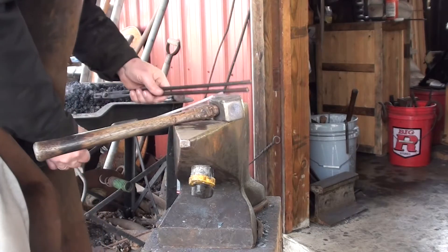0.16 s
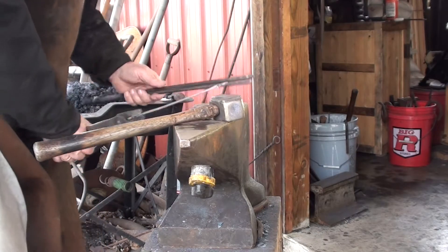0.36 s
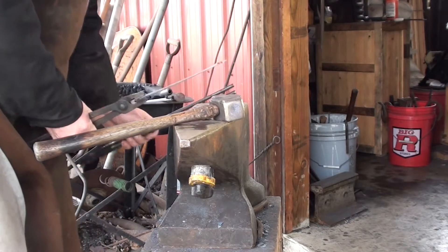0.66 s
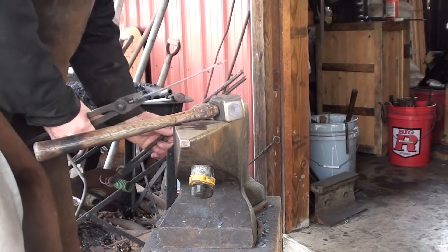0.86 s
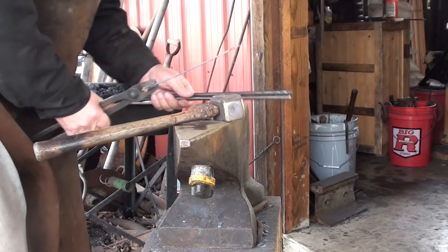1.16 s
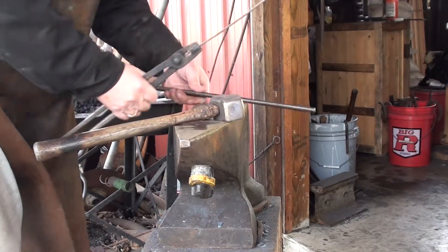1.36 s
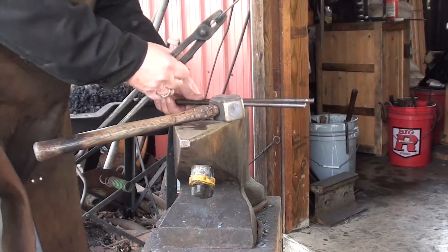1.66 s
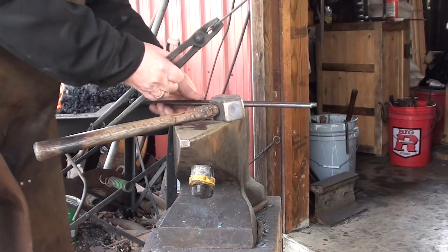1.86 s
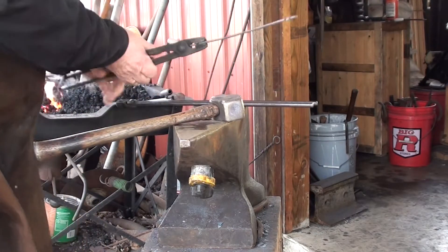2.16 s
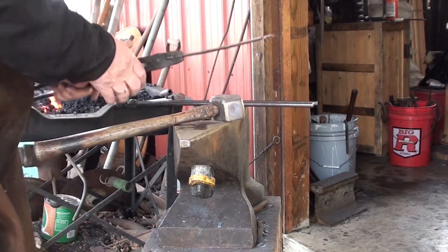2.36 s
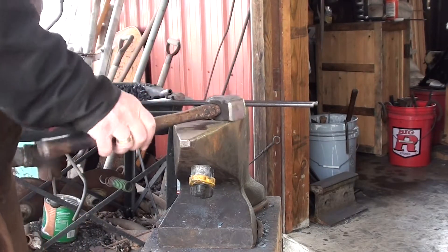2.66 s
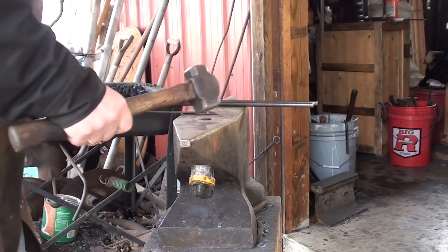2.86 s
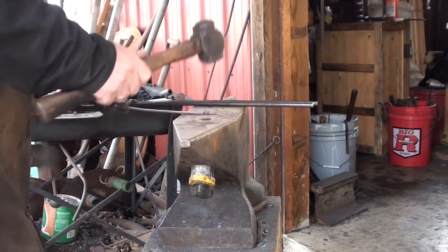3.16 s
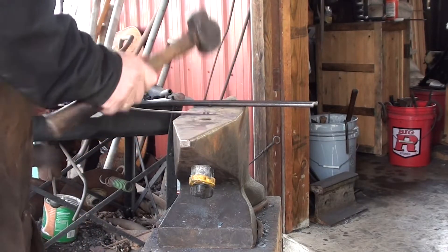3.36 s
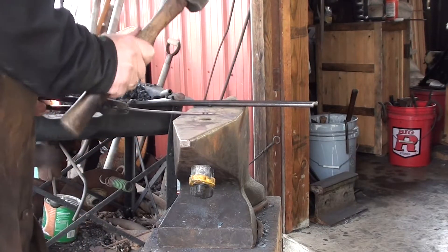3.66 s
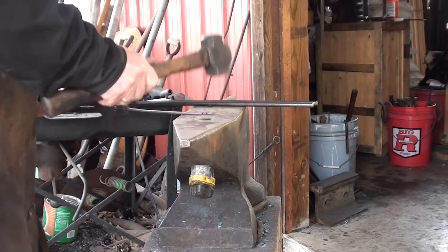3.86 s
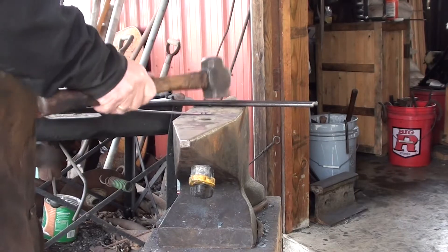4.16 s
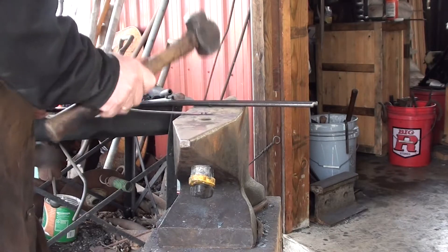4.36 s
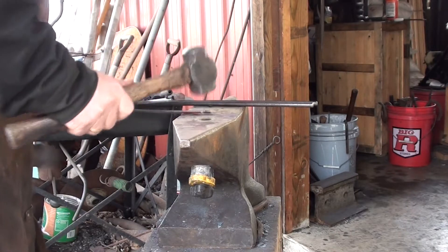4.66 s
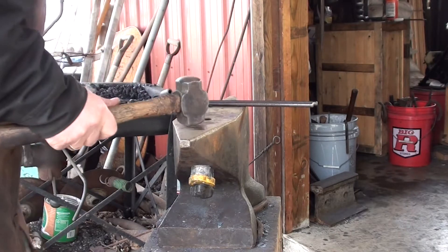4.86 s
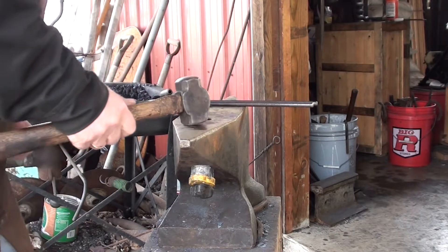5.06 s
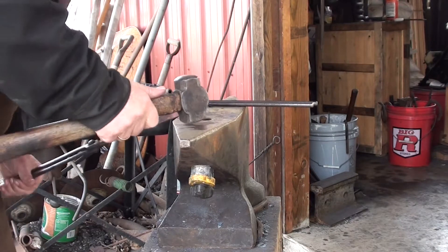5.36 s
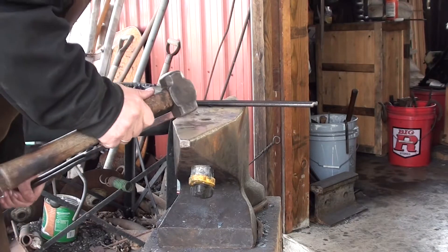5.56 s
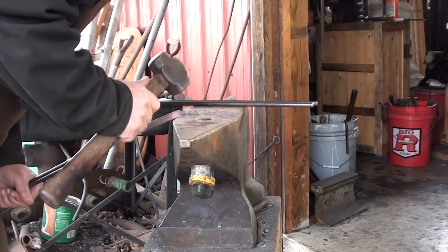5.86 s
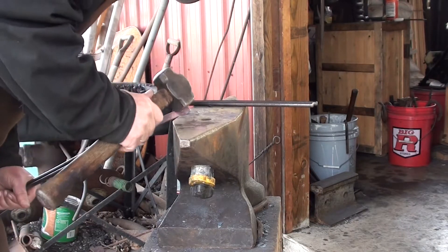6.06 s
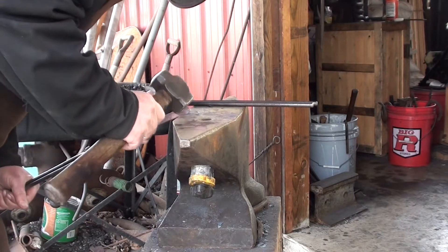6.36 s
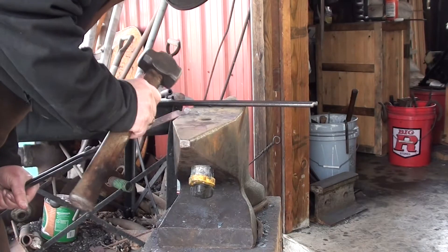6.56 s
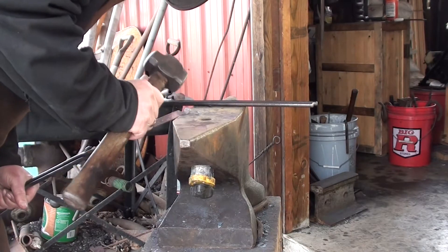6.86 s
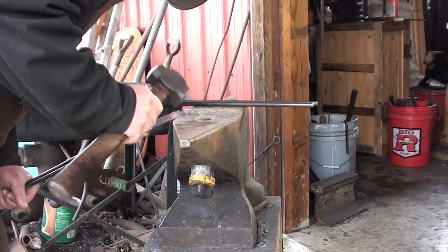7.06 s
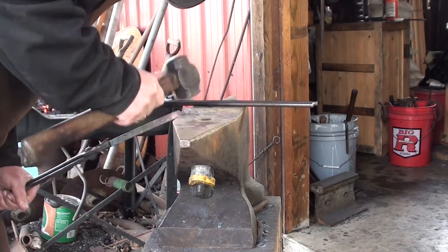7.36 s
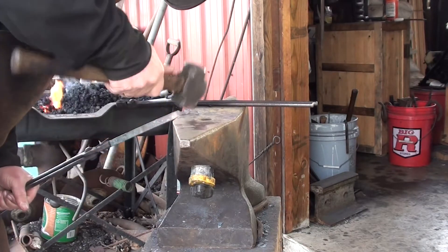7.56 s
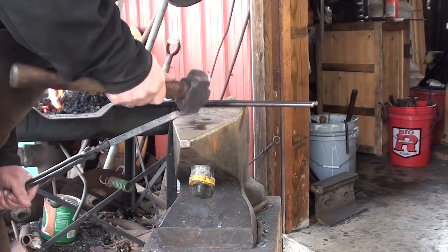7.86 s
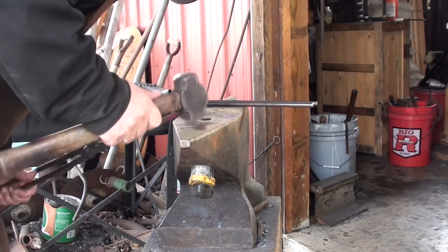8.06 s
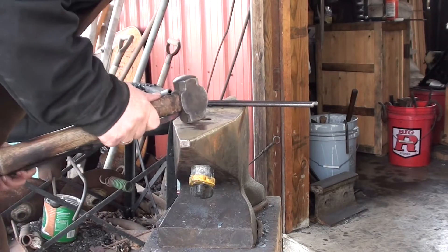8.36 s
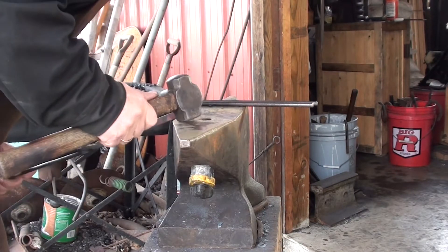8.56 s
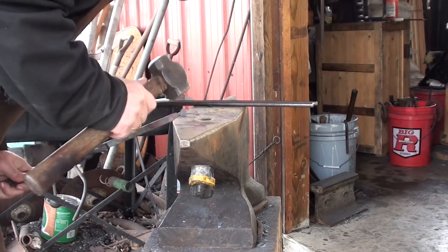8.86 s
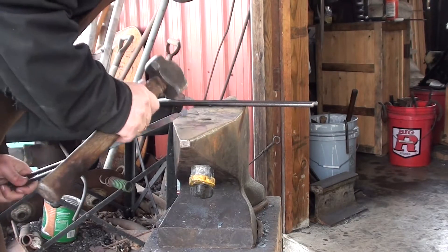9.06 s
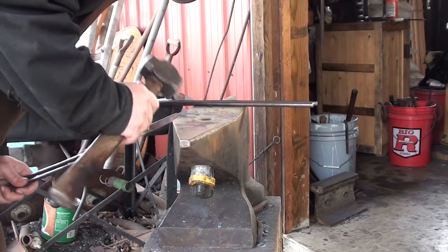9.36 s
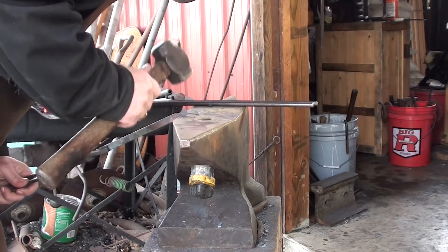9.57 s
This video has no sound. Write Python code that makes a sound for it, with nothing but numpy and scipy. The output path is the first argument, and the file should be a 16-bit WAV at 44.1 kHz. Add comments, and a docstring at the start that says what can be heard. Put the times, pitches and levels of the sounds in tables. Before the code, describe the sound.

In a small forge, light metal clinks and faint bird whistles give way to dull hammer knocks in steady runs, with occasional bright anvil rings.

```python
"""A forge murmurs in a small shed and a draught rumbles on the microphone throughout, both shaped noise.
Tongs and rod clink and scrape on the anvil (struck modes, noise bursts) as a far bird whistles (sines).
The hammer is picked up and dropped on the bare anvil, then works the rod in quick runs: blows knock dully,
those that reach the anvil ring, and the hammer bounces to rest. Nearly all is in the left channel.
Levels in dB are ahead of the shed's echoes and the channel gains."""
import sys
import numpy as np
from scipy import signal
from scipy.fft import rfft, irfft, next_fast_len
from scipy.io import wavfile

SR = 44100
rng = np.random.default_rng(int(sys.argv[2]) if len(sys.argv) > 2 else 0)


def inscribe(sig):
    """Save sig as 16-bit PCM at rate SR to the path in sys.argv[1].

    A 1-D sig is mono; a 2-D sig holds one channel per row.
    Samples are clipped to [-1, 1] before scaling.
    """
    pcm = np.round(np.clip(np.atleast_2d(sig).T, -1, 1) * 32767)
    wavfile.write(sys.argv[1], SR, pcm.astype(np.int16))


N = 427769
RING_SIZE = SR // 2  # samples that a contact may ring

# Hammer blows on the work. Each row: start in seconds, strength in dB, knock in Hz, support (0 overhanging
# the edge, 1 flat on the face), stand thud in dB, anvil ring in dB.
BLOWS = [(3.3642, -26.5, 930, 0.44, -35.5, -49.5), (3.7233, -26.5, 957, 0.85, -36, -42),
         (4.0692, -27, 985, 1, -38, -35), (4.3744, -25, 1005, .92, -37.5, -33),
         (4.6696, -28.5, 950, .9, -39.5, -20.5), (6.3071, -34, 1080, 0.38, -33, -56),
         (6.612, -31.5, 1210, 0.45, -41.5, -58.5), (6.9338, -25, 1194, 0.05, -35.5, -50),
         (7.2238, -26, 1225, 0.03, -33.5, -65.5), (7.5288, -27, 1065, 0.39, -28, -51.5),
         (7.814, -25.5, 976, 0.4, -31, -53), (8.032, -28.5, 1218, 1, -39.5, -23.5),
         (9.0672, -31, 1193, .08, -33, -55), (9.3594, -29, 1304, 0.3, -34, -63.5),
         (9.666, -29.5, 1146, 0.38, -33, -47)]
# Modes of the rod. Each row: frequency in Hz, relative level in dB, t60 in seconds.
ROD_MODES = [(3058, -16, .4), (3168, -18, .4), (4160, -18, .22), (5090, 0, .35), (5840, -13, .38),
             (6498, -11, .42), (7096, -1, .22), (9583, -12, .22), (10171, -3, .21), (12590, -5, .26),
             (15032, -9, .5)]
# Modes of the tongs. Each row: frequency in Hz, relative level in dB, t60 in seconds.
TONGS_MODES = [(1850, -15, .04), (2600, -15, .07), (3130, -9, .12), (3596, -5, .11), (4165, -4, .13),
               (4720, -3, .11), (5480, -4, .13), (5950, -4, .11), (6150, -3, .15), (6498, -8, .27),
               (7100, -6, .12), (7790, 1, .12), (7970, -1, .11), (8700, -6, .09), (9370, 0, .09),
               (9500, -4, .13), (10200, -7, .1), (11330, -6, .09), (12500, -8, .09), (13210, -6, .1),
               (14850, -12, .1)]
# Spectrum of a light steel tick. Each row: frequency in Hz, relative density in dB per Hz.
TICK_SPECTRUM = [(900, -9), (1500, -20), (2000, -7.5), (3500, 9), (6000, 17.5), (8000, 10.5), (11000, 3),
                 (16000, -5.5)]


def from_db(db):
    """Decibels to gain."""
    return 10 ** (np.asarray(db) / 20)


def rms_one(x):
    """Scale to rms 1."""
    return x / np.sqrt(np.mean(x ** 2) + 1e-20)


def unit_hit(x):
    """Scale a decaying sound to rms 1 over its first 50 ms."""
    return x / np.sqrt(np.mean(x[:SR // 20] ** 2) + 1e-20)


def gain_in_time(rows):
    """Curve of (s, dB) to one gain per sample."""
    s, db = np.transpose(rows)
    return from_db(np.interp(np.arange(N) / SR, s, db))


def at_hz(points, hz):
    """Read a table on a log-frequency axis."""
    f, value = np.transpose(points)
    return np.interp(np.log(np.maximum(hz, 1)), np.log(f), value)


def between(ends, share):
    """Go from the first value to the second as the share goes from 0 to 1."""
    return ends[0] + (ends[1] - ends[0]) * share


def noise(spectrum, size):
    """Noise with the given spectrum, falling steeply beyond its ends; rms 1."""
    padded = next_fast_len(size)
    hz = np.arange(padded // 2 + 1) * SR / padded + 1e-3
    low_hz, high_hz = spectrum[0][0], spectrum[-1][0]
    skirts = np.minimum(1, np.minimum(hz / low_hz, high_hz / hz)) ** 4
    white = rfft(rng.standard_normal(padded))
    shaped = white * from_db(at_hz(spectrum, hz)) * skirts
    return rms_one(irfft(shaped, padded)[:size])


def band(x, low_hz, high_hz):
    """Causal band-pass."""
    sos = signal.butter(2, [low_hz, min(high_hz, .45 * SR)], "band", fs=SR, output="sos")
    return signal.sosfilt(sos, x)


def fade(t60_s, size):
    """Exponential decay from 1."""
    return from_db(-60 * np.arange(size) / SR / t60_s)


def swell(s, half_s, db):
    """Bell-shaped gain around time s, at 1/e of its peak half_s away."""
    offset = (np.arange(N) / SR - s) / half_s
    return from_db(db) * np.exp(-np.minimum(offset ** 2, 50))


def add(track, s, sound):
    """Mix a sound into a track at time s."""
    start = round(s * SR)
    part = sound[:max(len(track) - start, 0)]
    track[start:start + len(part)] += part


def forge_air():
    """The fire's murmur and hiss: two noise bands whose levels wander separately."""
    # Murmur level. Each row: time in seconds, level in dB.
    murmur_level = [(0.0, -67.5), (1.21, -63), (1.38, -57.5), (2.0, -59), (2.75, -52.5), (2.94, -60),
                    (3.32, -56), (3.51, -67), (4.75, -63), (4.83, -59), (5.4, -65.5), (6.24, -59.5),
                    (7.08, -62), (8.08, -58), (8.26, -69.5), (8.54, -68.5), (9.24, -65), (9.7, -69.5)]
    # Hiss level. Each row: time in seconds, level in dB.
    hiss_level = [(0.0, -75), (0.59, -69.5), (1.19, -69), (1.38, -63.5), (1.59, -53), (1.89, -68.5),
                  (2.81, -63), (2.92, -74), (4.11, -77), (4.78, -64), (5.19, -70.5), (6.29, -69),
                  (8.08, -66.5), (8.21, -70), (9.18, -68), (9.7, -72.5)]
    # Murmur spectrum. Each row: frequency in Hz, relative density in dB per Hz.
    murmur_spectrum = [(59, -25.5), (100, -3.5), (200, -7), (414, -9), (530, -8.5), (590, -6.5), (1220, -8),
                       (3120, -26.5), (4000, -24), (5200, -48.5), (8800, -120)]
    # Hiss spectrum. Each row: frequency in Hz, relative density in dB per Hz.
    hiss_spectrum = [(1180, -29.5), (2000, -4.5), (3680, -8), (4490, -3.5), (4990, -9), (5830, -8.5),
                     (16000, -11.5)]
    murmur = gain_in_time(murmur_level) * noise(murmur_spectrum, N)
    return murmur + gain_in_time(hiss_level) * noise(hiss_spectrum, N)


def draught():
    """A steady low rumble of moving air; gusts swell it and buffet the microphone higher up."""
    still_air_db = -49  # rumble between gusts
    # Gusts. Each row: centre in seconds, half length in seconds, rumble in dB, buffeting in dB.
    gusts = [(0.886, 0.089, -36.5, -54), (1.55, .2, -42, -60), (2.003, 0.12, -33.5, -64),
             (2.35, 0.13, -27.5, -57), (2.886, 0.042, -32, -61), (3.177, 0.032, -19.5, -36.5),
             (5.027, 0.25, -38, -60.5), (6.65, 0.025, -48, -47), (7.508, 0.047, -57, -38),
             (7.702, 0.098, -31.5, -53.5), (8.062, 0.1, -41.5, -66), (9.138, 0.17, -44.5, -61),
             (9.683, .04, -40.5, -48.5)]
    # Rumble spectrum. Each row: frequency in Hz, relative density in dB per Hz.
    rumble_spectrum = [(12, 5), (22, -2.5), (35, -18.5), (60, -21.5), (120, -35.5), (250, -36)]
    # Buffeting spectrum. Each row: frequency in Hz, relative density in dB per Hz.
    buffet_spectrum = [(30, -11.5), (80, 1.5), (150, -8), (300, -15.5), (700, -29)]
    rumble_gain = from_db(still_air_db) + sum(swell(s, half_s, db) for s, half_s, db, _ in gusts)
    buffet_gain = sum(swell(s, half_s, db) for s, half_s, _, db in gusts)
    return rumble_gain * noise(rumble_spectrum, N) + buffet_gain * noise(buffet_spectrum, N)


def ring(modes, scatter_db, tilt_db=0):
    """Struck steel: each contact redraws mode levels and signs; tilt (dB per octave above 4 kHz) dulls it."""
    t = np.arange(RING_SIZE) / SR
    hz, db, t60_s = np.transpose(modes)
    db = db + tilt_db * np.log2(np.maximum(hz / 4000, 1))
    db = db + scatter_db * rng.standard_normal(len(hz))
    strengths = rng.choice([-1, 1], len(hz)) * from_db(db)
    partials = (g * fade(life_s, RING_SIZE) * np.sin(2 * np.pi * f * t)
                for g, f, life_s in zip(strengths, hz, t60_s))
    return unit_hit(sum(partials))


def packet(hz, peak_s):
    """A heavily damped resonance that swells until peak_s, then dies away."""
    t = np.arange(SR // 20) / SR
    envelope = (t / peak_s * np.exp(-t / peak_s)) ** 2
    return unit_hit(envelope * np.sin(2 * np.pi * hz * t))


def burst(spectrum, t60_s, tail_db, tail_t60_s):
    """Countless dense modes: rise in about a cycle of the highest, fall fast, leave a weaker tail."""
    cycles = np.arange(RING_SIZE) / SR * spectrum[-1][0]
    rise = 1 - np.exp(-cycles ** 2)
    decay = fade(t60_s, RING_SIZE) + from_db(tail_db) * fade(tail_t60_s, RING_SIZE)
    return unit_hit(noise(spectrum, RING_SIZE) * rise * decay)


def recolour(spectrum, patchy_db, count=36):
    """Each point of contact favours other groups of modes."""
    hz = np.geomspace(spectrum[0][0], spectrum[-1][0], count)
    return list(zip(hz, at_hz(spectrum, hz) + patchy_db * rng.standard_normal(count)))


def bobbing_stand(hz, peak_s, boom_db):
    """The anvil bobs on its sheet-steel stand, whose panels boom briefly."""
    # Panel modes. Each row: frequency in Hz, relative level in dB, t60 in seconds.
    panel_modes = [(340, -3, .07), (385, -1, .1), (412, 0, .13), (445, -11, .3), (478, -10, .33)]
    # Thud spectrum. Each row: frequency in Hz, relative density in dB per Hz.
    thud_spectrum = [(150, -13.5), (280, -18.5), (350, -11.5), (410, 1.5), (480, -2), (580, -10.5),
                     (900, -15)]
    thud = burst(thud_spectrum, t60_s=.06, tail_db=-15, tail_t60_s=.22)
    out = from_db(boom_db) * (ring(panel_modes, scatter_db=2.5) + thud)
    add(out, 0, packet(hz * (1 + 0.039 * rng.standard_normal()), peak_s))
    return unit_hit(out)


def clinking(split_hz):
    """Loose steel on steel: bright tick, tongs jangle, faint stand bump; the rod clangs and rings freely."""
    tongs_ring_db = -2  # against the tick
    low_jangle_db = -6  # below split_hz, against the part above
    thud_db, thud_follows = -44, 0.47  # stand bump; share of the strength that it follows
    # Clinks of tongs and rod; the last is a second bright crack of a hammer blow.
    # Each row: start in seconds, level in dB.
    clinks = [(0.152, -28), (0.504, -30.5), (0.512, -36.5), (0.603, -42), (1.129, -32), (1.152, -38.5),
              (1.19, -43), (1.232, -40), (1.254, -49.5), (1.401, -39), (1.42, -28.5), (1.443, -33),
              (1.464, -33.5), (1.546, -51), (1.648, -28.5), (1.815, -45.5), (2.533, -52), (2.617, -51),
              (6.621, -28.5)]
    # Bounces of the loosely held rod on the anvil. Each row: start in seconds, level in dB.
    rod_bounces = [(.504, -31.5), (.513, -41), (.602, -46)]
    out = np.zeros(N)
    for s, db in clinks:
        tick = burst(recolour(TICK_SPECTRUM, patchy_db=4.0), t60_s=.028, tail_db=-14, tail_t60_s=.17)
        jangle = from_db(tongs_ring_db) * ring(TONGS_MODES, scatter_db=2.5) + tick
        add(out, s, from_db(db + low_jangle_db) * unit_hit(band(jangle, 880, split_hz)))
        add(out, s, from_db(db) * unit_hit(band(jangle, split_hz, 20400)))
        bump = bobbing_stand(hz=424, peak_s=0.017, boom_db=0.5)
        add(out, s, from_db(thud_db + thud_follows * db) * bump)
    clang_spectrum = [(2800, -20), (3080, 0), (3250, -2), (3600, -20)]  # Hz, dB per Hz
    for s, db in rod_bounces:
        add(out, s, from_db(db) * ring(ROD_MODES, scatter_db=1.0))
        clang = burst(clang_spectrum, t60_s=.07, tail_db=-15, tail_t60_s=.5)
        add(out, s, from_db(db - 5) * clang)
    return out


def bird(waver):
    """Thin, nearly level whistles: sines whose pitch wavers slowly by the given rms share."""
    # Notes. Each row: start in seconds, length in seconds, pitch in Hz, peak level in dB.
    notes = [(0.22, 0.1, 3340, -59.5), (0.876, 0.1, 3364, -56), (1.677, 0.1, 4260, -50),
             (1.867, 0.12, 4305, -51.5), (2.068, 0.071, 4320, -48), (2.252, 0.073, 4340, -51),
             (2.737, 0.31, 3270, -55.5), (3.076, 0.061, 7670, -59)]
    out = np.zeros(N)
    for s, length_s, hz, db in notes:
        size = int(length_s * SR)
        pitch_hz = hz * (1 + waver * noise([(15, 0.69), (150, 0)], size))
        envelope = np.sin(np.linspace(0, np.pi, size))
        whistle = np.sin(2 * np.pi * np.cumsum(pitch_hz) / SR)
        add(out, s, from_db(db) * envelope * whistle)
    return out


def outdoors(x, echo_db, t60_s):
    """Distant sounds trail a faint scattered echo."""
    tail = rng.standard_normal(SR) * fade(t60_s, SR)
    echo = signal.fftconvolve(x, tail / np.linalg.norm(tail))[:N]
    return x + from_db(echo_db) * echo


def scraping(slips_per_s, spread_db):
    """Sliding steel catches and slips: uneven tiny ticks that set the tongs ringing."""
    # Scrapes. Each row: start in seconds, length in seconds, level in dB.
    scrapes = [(.52, 0.051, -42), (1.129, 0.14, -41.5), (1.399, 0.091, -36.5), (1.499, 0.21, -52),
               (2.514, 0.15, -57.5)]
    out = np.zeros(N)
    for s, length_s, db in scrapes:
        count = max(2, round(length_s * slips_per_s))
        slips = np.zeros(int(length_s * SR))
        slips[rng.integers(0, len(slips), count)] = from_db(spread_db * rng.standard_normal(count))
        tick = burst(recolour(TICK_SPECTRUM, patchy_db=4.0), t60_s=0.023, tail_db=-13.5, tail_t60_s=0.12)
        body = tick + from_db(-4.5) * ring(TONGS_MODES, scatter_db=5.0)
        sound = signal.fftconvolve(slips, body)
        add(out, s, from_db(db) * sound / np.std(sound[:len(slips)]))
    return out


def rustling():
    """Sleeves and apron rustle as the smith moves: brief swells of noise."""
    # Rustles. Each row: centre in seconds, half length in seconds, level in dB.
    rustles = [(.74, 0.15, -59), (2.347, 0.078, -66.5), (3.214, 0.13, -67), (5.25, 0.12, -63),
               (5.774, 0.049, -64.5), (7.555, 0.16, -62.5), (8.485, 0.045, -65)]
    # Cloth spectrum. Each row: frequency in Hz, relative density in dB per Hz.
    cloth_spectrum = [(1200, -13.5), (2400, -2), (5000, -1.5), (8000, -7.5), (12000, -18)]
    return sum(swell(s, half_s, db) for s, half_s, db in rustles) * noise(cloth_spectrum, N)


def pickup(t60_s):
    """The hammer is picked up: short, hand-damped clunks of its wooden handle."""
    # Clunks. Each row: start in seconds, level in dB, pitch in Hz.
    clunks = [(2.566, -43.5, 2600), (2.565, -50.5, 1210), (2.5683, -53.5, 5450), (2.609, -40.5, 2119),
              (2.655, -63, 2140), (2.696, -55, 1047), (2.706, -55.5, 2154)]
    out = np.zeros(N)
    for s, db, hz in clunks:
        # narrow noise around and just below hz
        spectrum = [(0.93 * hz, -22), (.92 * hz, -8), (hz, 0), (0.96 * hz, -8), (0.97 * hz, -22)]
        add(out, s, from_db(db) * burst(spectrum, t60_s, tail_db=-24.5, tail_t60_s=0.17))
        add(out, s, from_db(db - 6) * packet(hz, peak_s=.0007))
        add(out, s, from_db(-56) * bobbing_stand(hz=496, peak_s=0.0094, boom_db=0.5))
    return out


def contact(thud_db, knock_db, knock_hz, knock_s, clack_db, crack_db, anvil_db, rod_db):
    """The hammer knocks, clacks and cracks, shakes the stand and rings whatever steel is free to move."""
    head_ring_db = -11.5  # hammer head against the crack
    soft_below_db, soft_tilt_db = -31, 0.8  # crack below this dulls the anvil: dB per octave for each dB
    # Anvil modes. Each row: frequency in Hz, relative level in dB, t60 in seconds.
    anvil_modes = [(1022, -17, .19), (2550, -18, .2), (3055, -9, .22), (3158, -4, .12), (3174, 0, .14),
                   (3192, -6, .16), (4350, -24, .18), (4965, -20, .15), (6352, -6, .14), (6380, -3, .15),
                   (6498, -17, .33), (7036, -22, .13), (7770, -22, .15), (9475, -18, .16), (9583, -14, .17),
                   (12590, -27, .18)]
    # Hammer head modes. Each row: frequency in Hz, relative level in dB, t60 in seconds.
    head_modes = [(4700, -1, .09), (5800, -3, .09), (7549, -2, .11), (8509, -3, .1), (9600, -6, .1),
                  (13250, -8, .09), (15034, -11, .33)]
    # Clack spectrum. Each row: frequency in Hz, relative density in dB per Hz.
    clack_spectrum = [(1400, -8), (1950, 3.5), (2500, -1.5), (3000, -4.5)]
    # Crack spectrum. Each row: frequency in Hz, relative density in dB per Hz.
    crack_spectrum = [(1500, -11.5), (3000, -8.5), (4300, 13), (5600, -1), (8000, 3), (11000, 0.5),
                      (16000, -16)]
    out = from_db(thud_db) * bobbing_stand(hz=393.6, peak_s=0.0046, boom_db=-5)
    add(out, 0, from_db(knock_db) * packet(knock_hz, knock_s))
    clack_hz = 2400 * (1 + 0.011 * rng.standard_normal())
    add(out, 0, from_db(clack_db - 3.0) * packet(clack_hz, peak_s=0.00095))
    clack_colour = recolour(clack_spectrum, patchy_db=1.5, count=9)
    add(out, 0, from_db(clack_db) * burst(clack_colour, t60_s=0.015, tail_db=-26.0, tail_t60_s=0.23))
    crack_colour = recolour(crack_spectrum, patchy_db=7.0)
    crack = burst(crack_colour, t60_s=0.042, tail_db=-15.5, tail_t60_s=0.053)
    add(out, 0.00045, from_db(crack_db) * crack)
    add(out, 0, from_db(crack_db + head_ring_db) * ring(head_modes, scatter_db=2.5))
    # light bounces stay longer in contact and ring duller
    dull_db = np.clip(soft_tilt_db * (crack_db - soft_below_db), -18, 0)
    add(out, 0, from_db(anvil_db) * ring(anvil_modes, scatter_db=2.5, tilt_db=dull_db))
    add(out, 0, from_db(rod_db) * ring(ROD_MODES, scatter_db=2.0, tilt_db=-9))
    return out


def tapping(knock_hz, knock_s):
    """The hammer drops on the bare anvil and bounces to rest: the harder the touch, the more it cracks."""
    knock_db, clack_db, rod_db = -3.5, 0.5, -34.5  # against the strength
    crack_ends_db = (-30, 5)  # softest, hardest; against the strength
    thud_db, thud_follows = -33.5, 0.25  # stand answers even light taps; share of strength it follows
    # Taps. Each row: start in seconds, strength in dB, hardness 0-1, anvil ring in dB.
    taps = [(2.8728, -29, 0.53, -30), (2.9215, -41.5, 0.5, -42), (4.7883, -31.5, 0.82, -23.5),
            (4.8266, -40.5, 0.2, -38.5), (4.8575, -48.5, .25, -57), (5.9562, -56.5, 0.91, -82),
            (6.0507, -71.5, 1, -83), (8.14, -30, 0.42, -32.5), (8.181, -36, 0.2, -55),
            (8.2035, -43.5, .05, -75)]
    out = np.zeros(N)
    for s, db, hardness, anvil_db in taps:
        thud = thud_db + thud_follows * db
        crack = db + between(crack_ends_db, hardness)
        add(out, s, contact(thud, db + knock_db, knock_hz, knock_s, db + clack_db, crack,
                            anvil_db, db + rod_db))
    return out


def hammering():
    """Work lying flat clacks and sets the rod ringing; work over the edge only knocks dully."""
    # (overhanging, flat); levels against the strength of the blow
    knock_db, clack_db, crack_db, rod_db = (0.33, -0.5), (-17, 2), (-6, -5), (-44.5, -13.5)
    knock_peak_s = (.0009, .0011)
    out = np.zeros(N)
    for s, db, knock_hz, support, thud_db, anvil_db in BLOWS:
        parts_db = (knock_db, clack_db, crack_db, rod_db)
        knock, clack, crack, rod = (db + between(part, support) for part in parts_db)
        knock_s = between(knock_peak_s, support)
        add(out, s, contact(thud_db, knock, knock_hz, knock_s, clack, crack, anvil_db, rod))
    return out


def input_recovery():
    """After each blow the overloaded microphone input recovers with a soft low bump, strongest on flat work."""
    delay_s, rise_s, decay_s = .072, 0.00016, .02  # rise and decay are time constants
    bump_db = (-24, -6)  # overhanging, flat; against the strength of the blow
    out, t = np.zeros(N), np.arange(RING_SIZE) / SR
    bump = np.exp(-t / decay_s) - np.exp(-t / rise_s)
    for s, db, _, support, _, _ in BLOWS:
        add(out, s + delay_s, -from_db(db + between(bump_db, support)) * bump)
    return out


def shed(x, wet_db, first_s, echo_count):
    """A few hard echoes from near walls amid a diffuse tail that dies band by band."""
    # Decay of the shed. Each row: frequency in Hz, t60 in seconds.
    shed_decay = [(200, 0.26), (500, 0.29), (1200, 0.18), (3000, 0.16), (8000, 0.25), (16000, 0.26)]
    size, edges_hz = SR // 2, np.geomspace(150, 19000, 12)
    tail = np.zeros(size)
    for low_hz, high_hz in zip(edges_hz, edges_hz[1:]):
        t60_s = at_hz(shed_decay, np.sqrt(low_hz * high_hz))
        tail += band(rng.standard_normal(size), low_hz, high_hz) * fade(t60_s, size)
    tail = tail * np.clip(np.arange(size) / SR / first_s - .5, 0, 1)
    tail = tail / np.linalg.norm(tail)
    echo_at = (rng.uniform(first_s, .03, echo_count) * SR).astype(int)
    tail[echo_at] += 0.23 * rng.choice([-1, 1], echo_count)
    return x + from_db(wet_db) * signal.fftconvolve(x, tail)[:N]


def scene():
    """Everything reaches one microphone; the right channel holds only a trace of it and its own hiss."""
    # Channel gains: left, right in dB.
    channel_db = [6.5, -48]
    steel = clinking(split_hz=4630) + scraping(slips_per_s=320, spread_db=6) + pickup(t60_s=0.038)
    steel = steel + tapping(knock_hz=1060, knock_s=0.0014) + hammering()
    far_bird = outdoors(bird(waver=0.0095), echo_db=-7.5, t60_s=.9)
    mono = shed(steel + far_bird, wet_db=-12.5, first_s=.007, echo_count=6)
    mono = mono + input_recovery() + forge_air() + draught() + rustling()
    hiss_spectrum = [(20, 22.0), (100, 6.0), (500, 1), (2000, -1.5), (16000, -5.0)]  # Hz, dB per Hz
    right_hiss = from_db(-65.5) * noise(hiss_spectrum, N)
    return mono * from_db(channel_db)[:, None] + right_hiss * np.array([[0], [1]])


def record(dry):
    """The hardest blows overload the input, which rounds off near full scale; the top is cut."""
    ceiling, cutoff_hz = 0.87, 16200
    clipped = dry / (1 + (dry / ceiling) ** 6) ** (1 / 6)
    return signal.sosfilt(signal.ellip(10, .1, 70, cutoff_hz, fs=SR, output="sos"), clipped)


dry = scene()
out = record(dry)
inscribe(out)
```